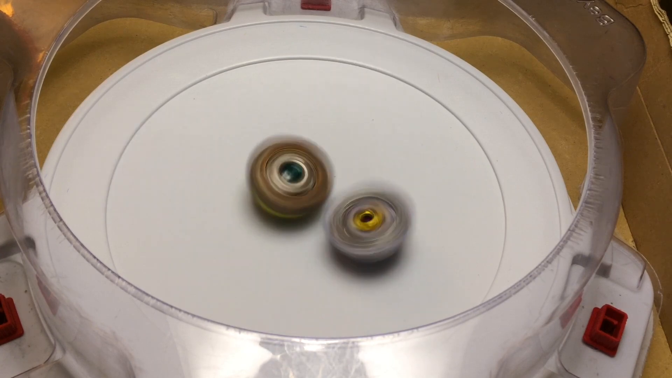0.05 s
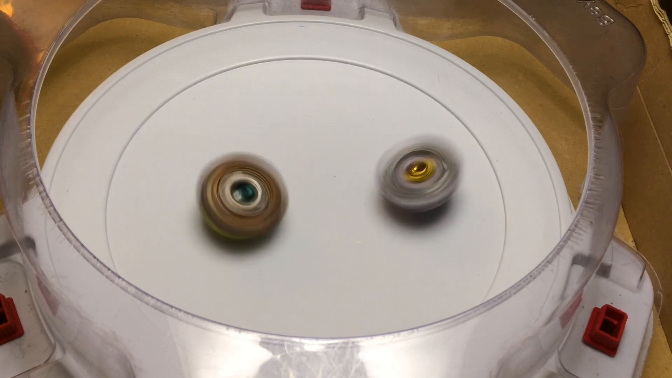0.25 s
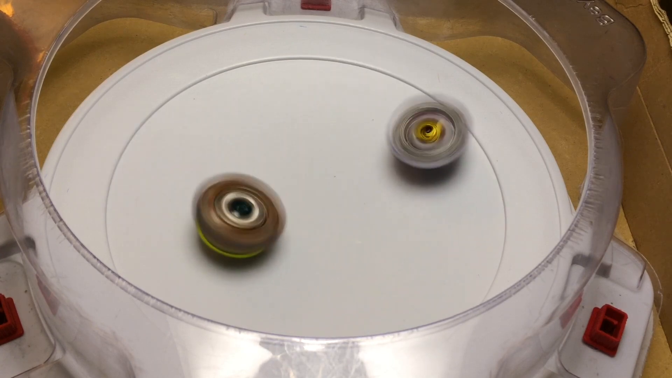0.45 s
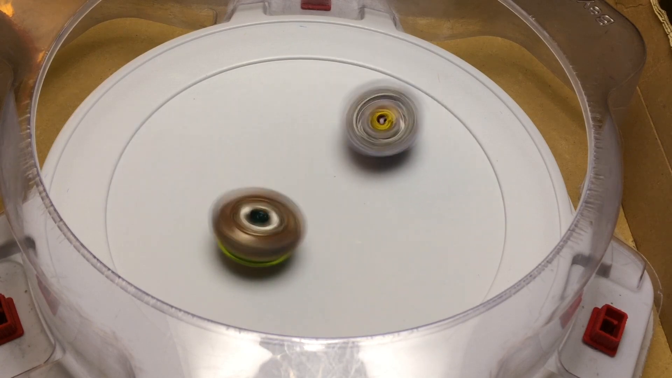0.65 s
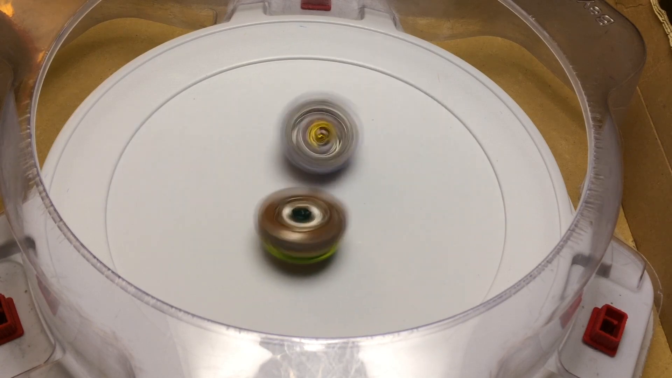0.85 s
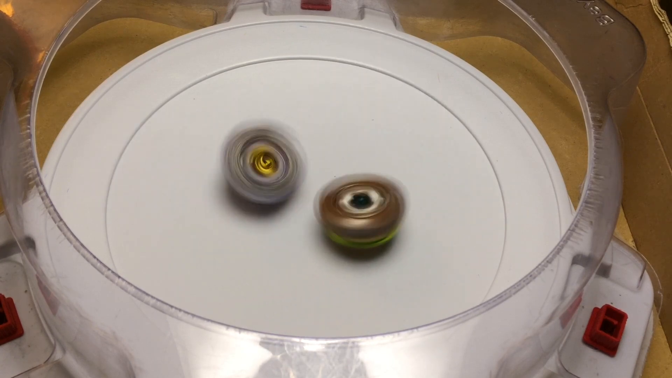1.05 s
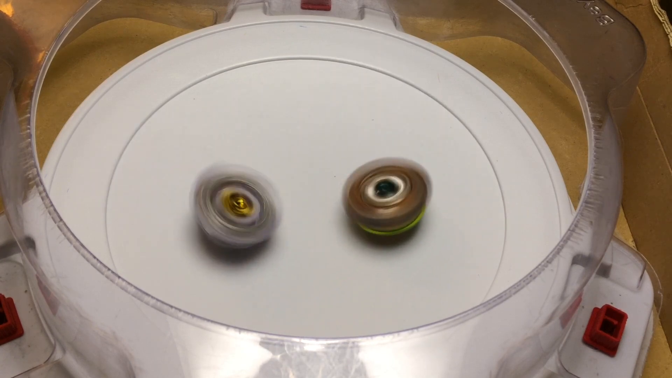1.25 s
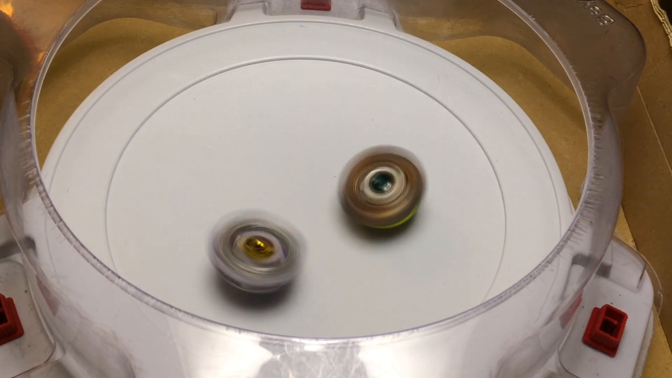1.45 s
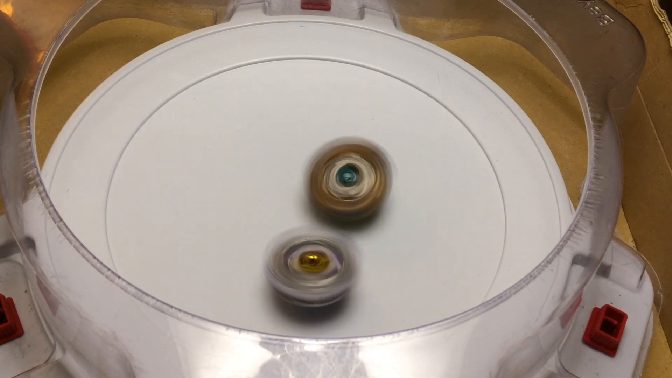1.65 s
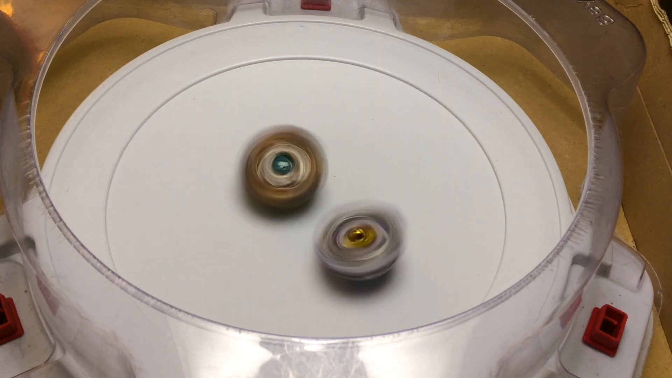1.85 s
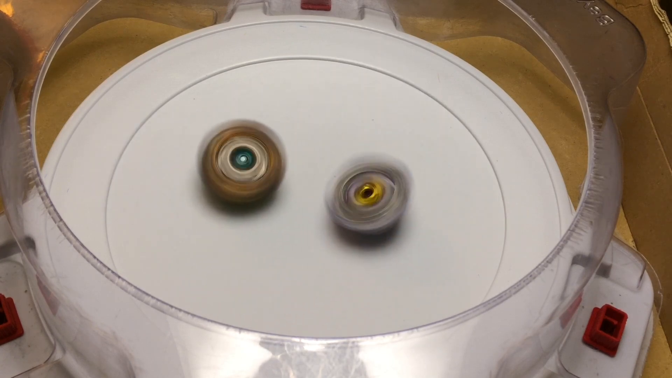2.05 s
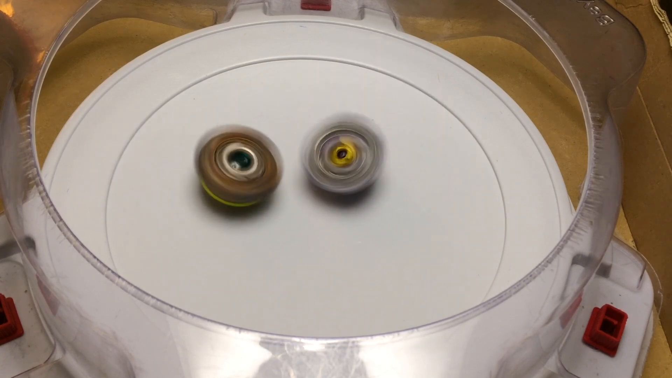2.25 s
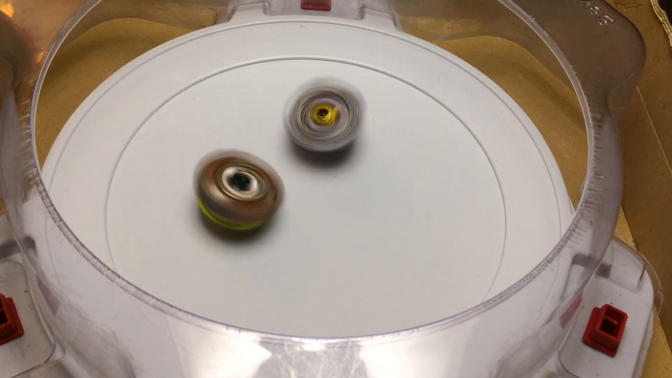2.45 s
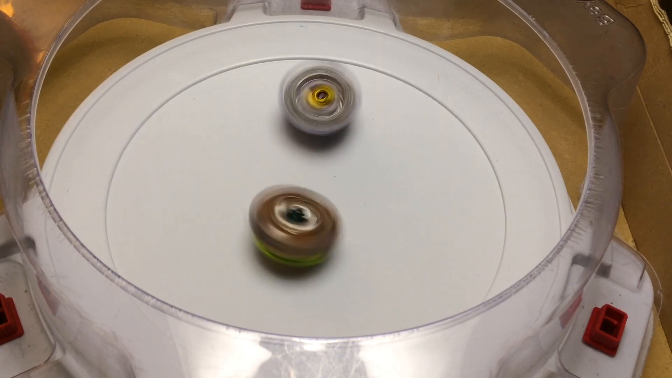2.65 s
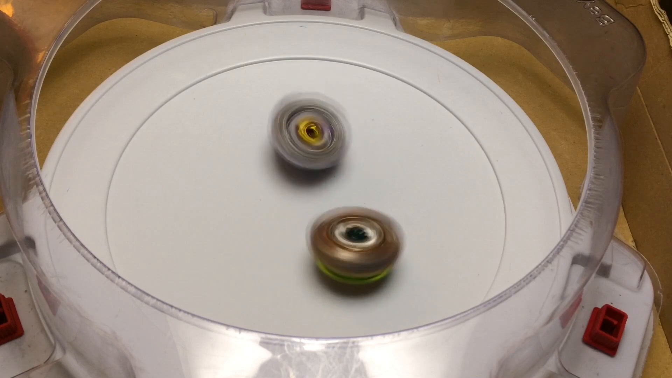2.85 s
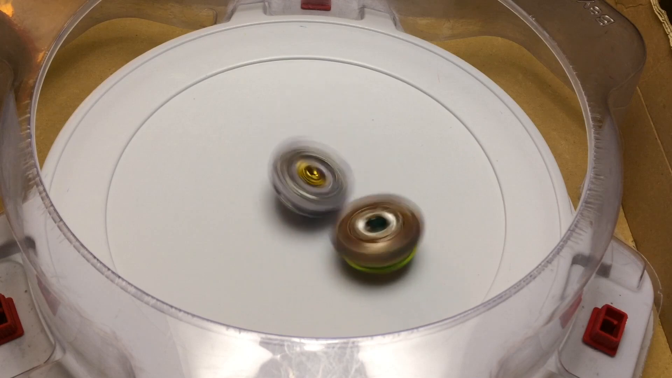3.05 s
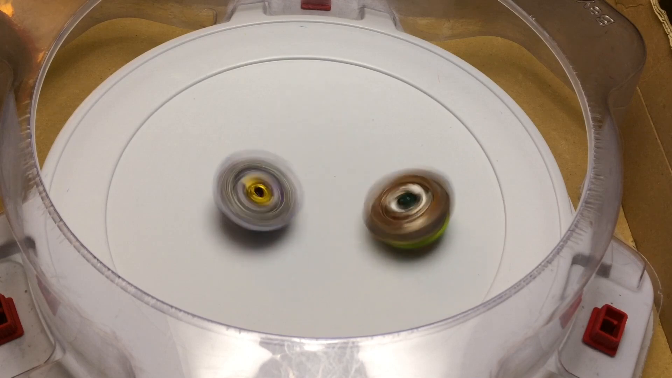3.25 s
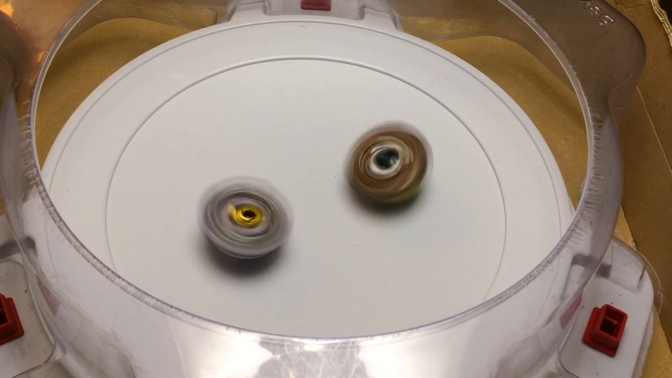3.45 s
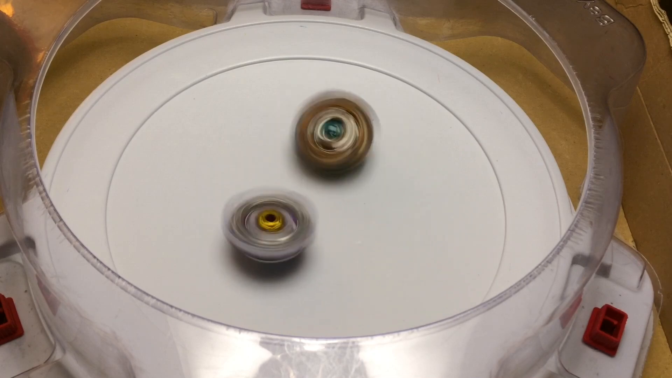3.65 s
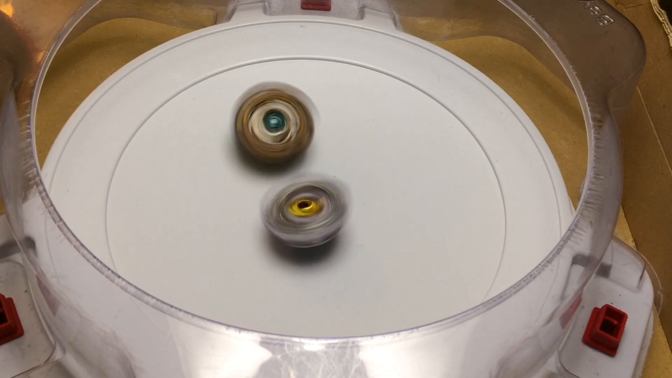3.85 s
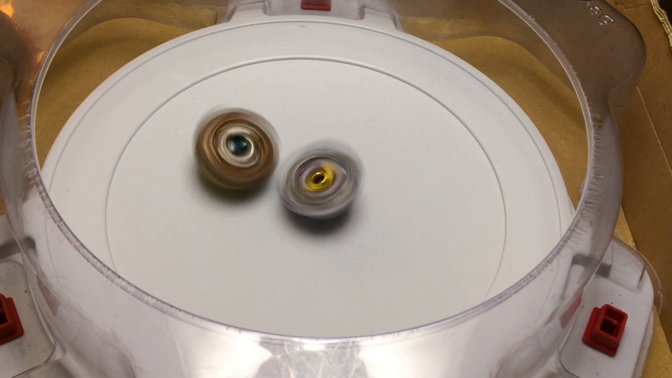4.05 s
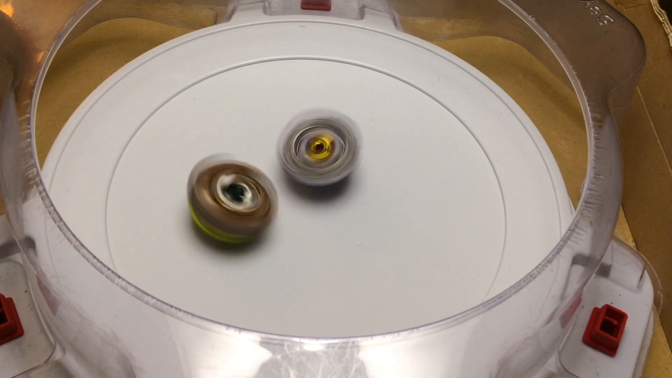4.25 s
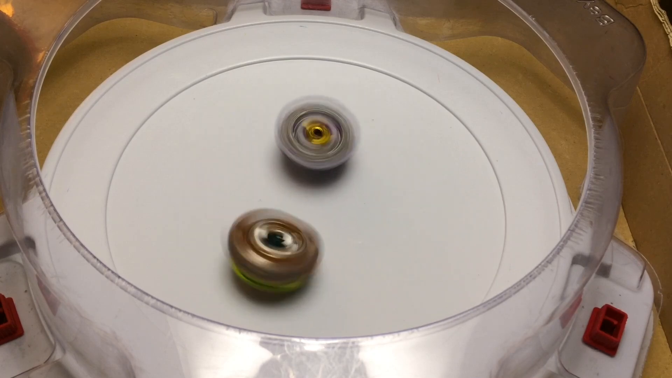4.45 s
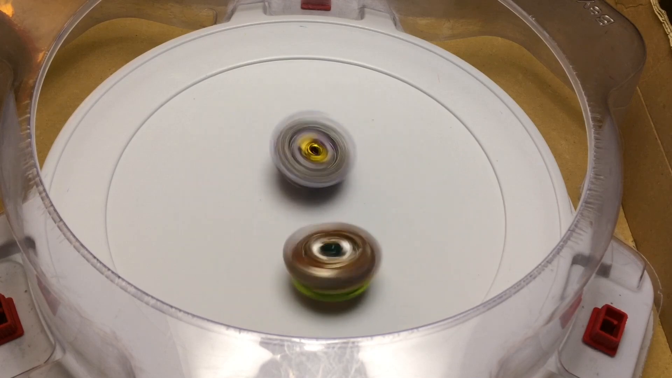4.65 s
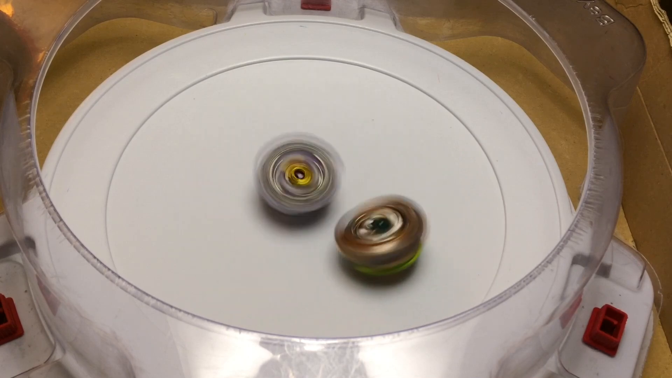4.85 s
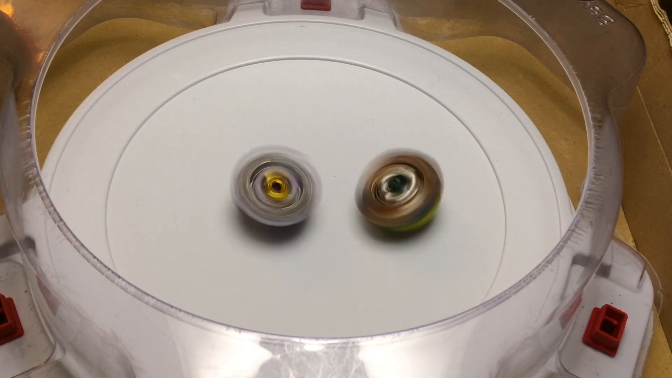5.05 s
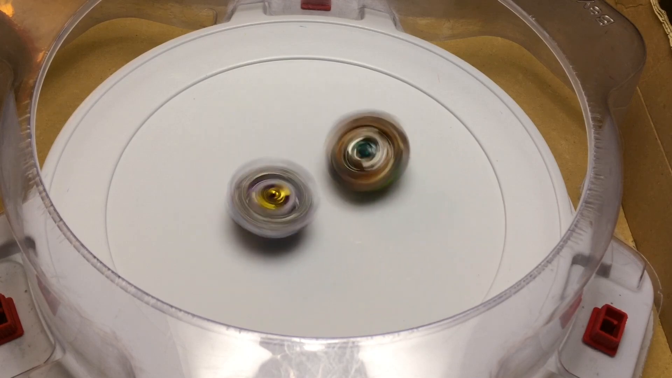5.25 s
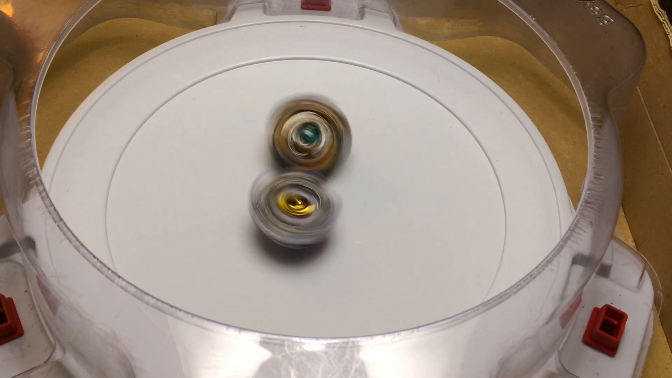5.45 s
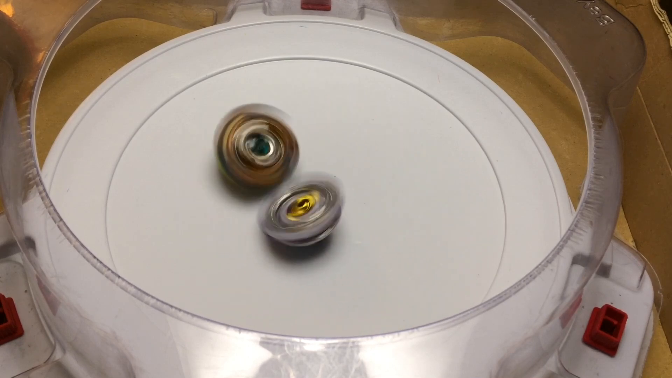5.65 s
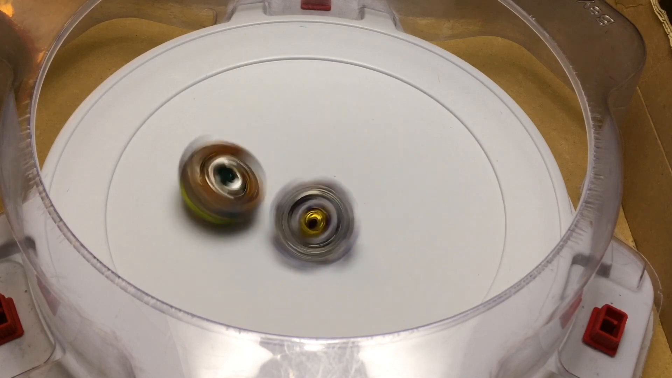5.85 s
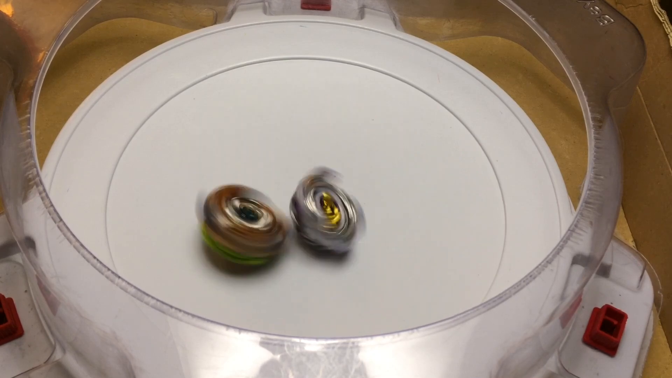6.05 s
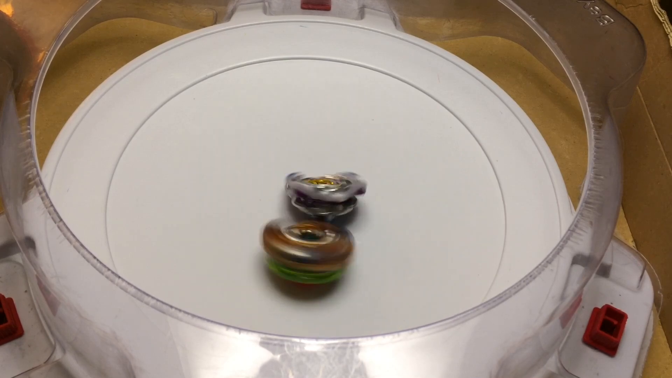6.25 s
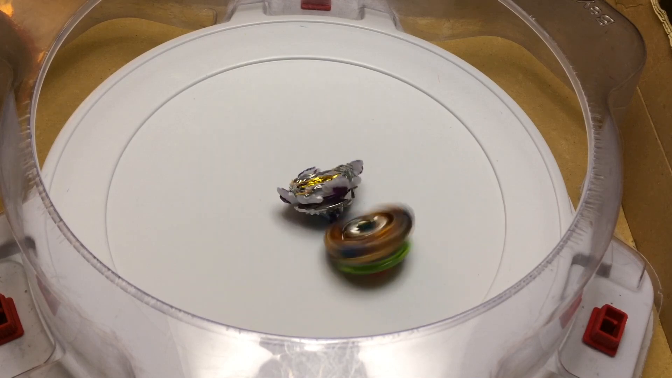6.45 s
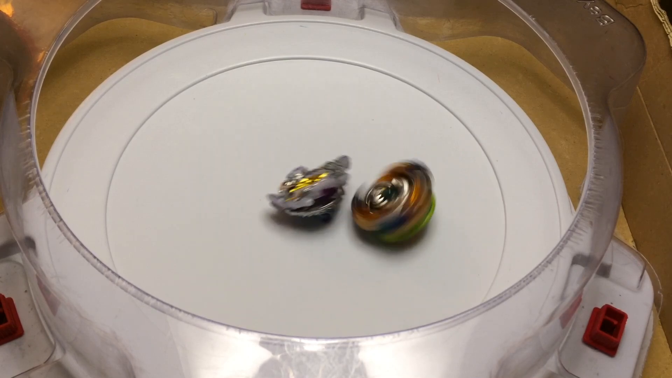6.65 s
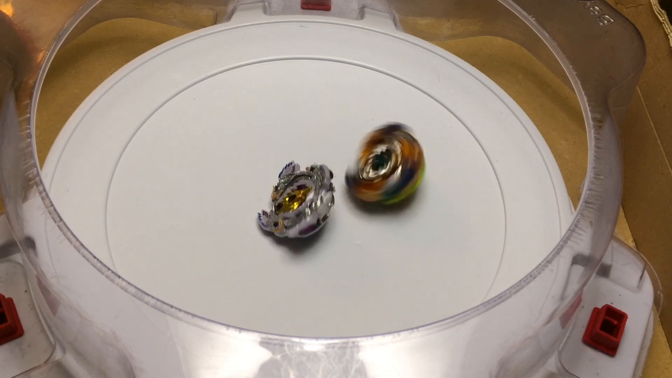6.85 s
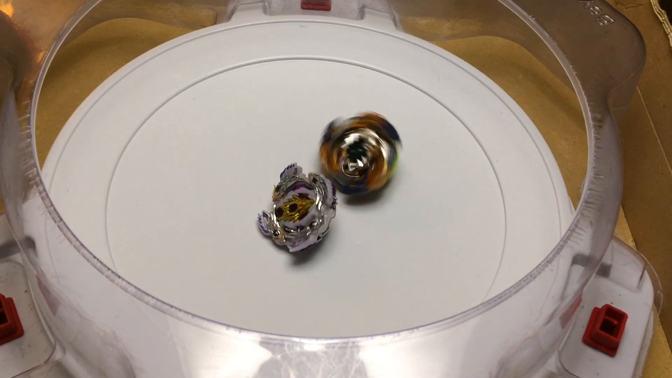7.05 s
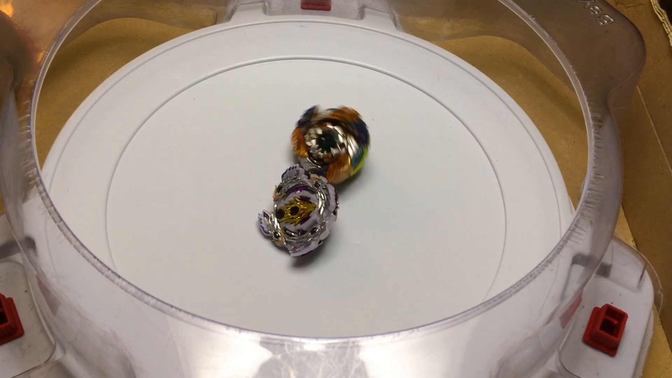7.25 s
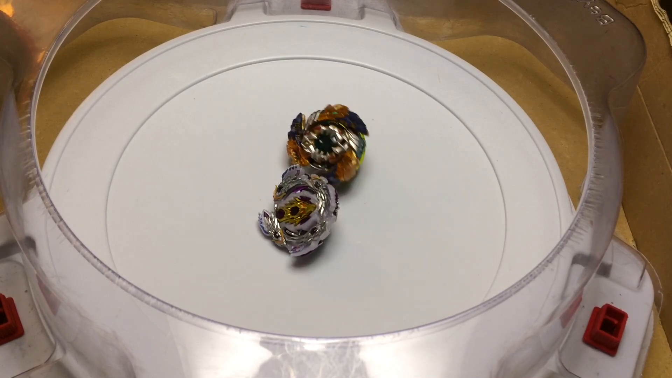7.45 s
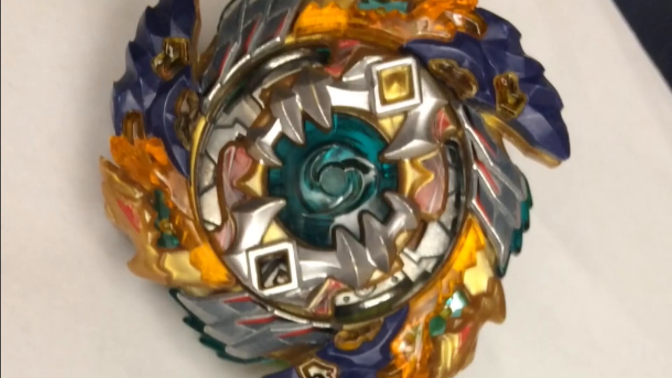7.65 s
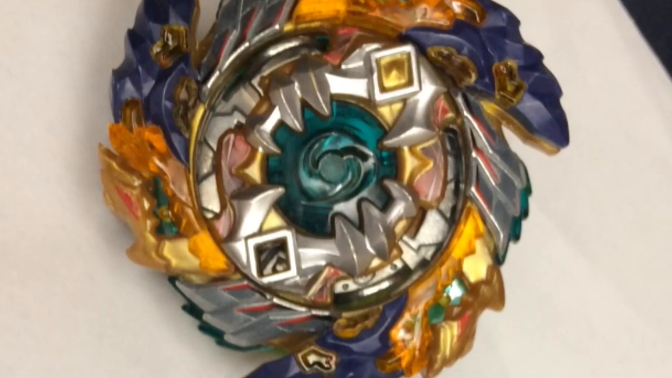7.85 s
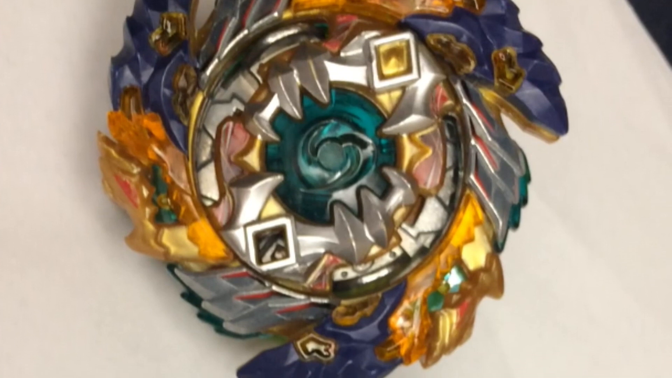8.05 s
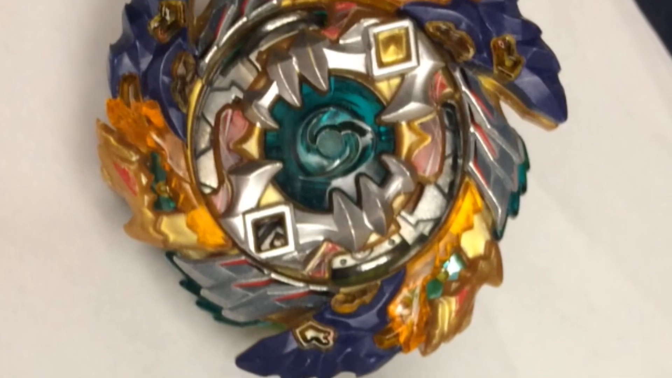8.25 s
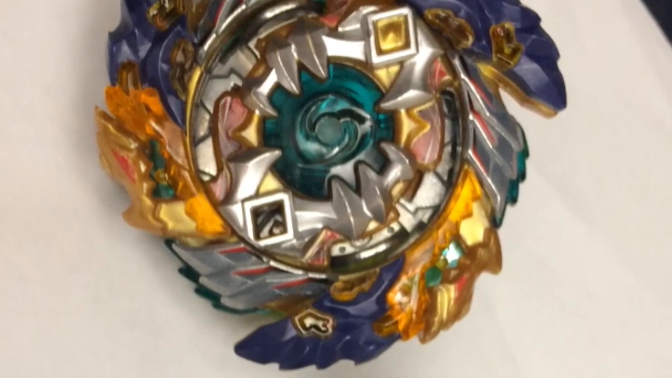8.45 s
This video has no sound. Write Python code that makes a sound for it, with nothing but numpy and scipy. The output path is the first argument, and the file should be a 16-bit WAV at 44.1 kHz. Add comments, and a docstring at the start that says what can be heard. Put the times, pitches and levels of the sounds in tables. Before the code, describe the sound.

Metal-rimmed tops whirr and scrape in a plastic bowl, crack together several times, then one falls, clatters and knocks weakly to a stop.

```python
"""Tips grind and chatter on thin plastic, then rims clash: two spinning tops circle in a dish in a small room.
Dense micro-impacts make the grinding, short noise bursts the skips, and ringing modes the metal of the rims;
the dish hums as a sinking sine with its octave, and rumbles as low filtered impacts. One top keels over,
knocks and scrapes to rest, the other nudges it ever more weakly, and the sound fades to silence."""
import sys
import numpy as np
from scipy import signal
from scipy.fft import rfft, irfft, next_fast_len
from scipy.io import wavfile
from scipy.ndimage import uniform_filter1d, map_coordinates

SR = 44100
rng = np.random.default_rng(int(sys.argv[2]) if len(sys.argv) > 2 else 0)


def bounce(signal):
    """Save signal as a 16-bit WAV file at the path given by the first command-line argument."""
    frames = np.transpose(np.atleast_2d(signal))
    limited = np.clip(frames, -1, 1)
    pcm = np.round(limited * 32767).astype(np.int16)
    wavfile.write(sys.argv[1], SR, pcm)


N = 375291

# Levels in the tables are relative: each layer adds its own trim.
# faint steady noise around the tops: (frequency [Hz], density [dB per Hz])
AIR_SPECTRUM = [(20, -14.5), (90, 0), (300, -5), (1000, -12), (4000, -25), (15000, -30.5)]
# decay of the room: (frequency [Hz], t60 [s])
ROOM_DECAY = [(100, 0.96), (500, 0.49), (3000, 0.36), (8000, 0.23), (15000, 0.17)]
# final fade: (time [s], level [dB])
FADE_LEVEL = [(0, -3), (7.62, -2.5), (7.655, -10), (7.68, -74), (7.72, -140)]
TOP_HZ = 16100  # the band ends here

# whirr of the fast, unbalanced top: (time [s], pitch [Hz])
WHIRR_PITCH_CURVE = [(0, 101), (0.95, 96.5), (1.2, 91.5), (1.6, 87.7), (2.7, 85)]
# loudness of its fundamental: (time [s], level [dB])
WHIRR_LEVEL_CURVE = [(0.0, -55), (0.31, -42.5), (0.49, -58), (0.7, -71), (0.85, -36), (1.06, -45),
                     (1.19, -35), (1.23, -44), (1.88, -52), (2.15, -39.5), (2.5, -43.5), (2.75, -58)]
WHIRR_END_S, WHIRR_FADE_DB_PER_S = 2.3, 20  # the whirr dies away from here

# low rumble of the dish: (time [s], level [dB])
RUMBLE_LEVEL_CURVE = [(0, -56.5), (0.25, -50), (0.6, -62.5), (0.9, -53.5), (2.3, -54), (2.75, -61),
                      (3.15, -52.5), (3.4, -59), (4.0, -54), (4.55, -60), (4.9, -54), (5.35, -58.5),
                      (6.1, -45.5), (6.4, -57), (6.9, -58), (7.55, -72)]
# colour of rumble and shudder: (frequency [Hz], density [dB per Hz])
RUMBLE_SPECTRUM = [(20, -49.5), (45, -17), (68, -9.5), (90, -3.5), (112, -4.5), (145, -14), (220, -14.5),
                   (400, -33.5), (1000, -78.5)]
# the whole dish shakes after a blow
SHUDDER_DB, SHUDDER_RISE_S, SHUDDER_T60_S = 2.5, 0.0053, 0.15
SHUDDER_GROWS = 0.55  # dB per dB of the blow: soft blows are the deepest

# resonances of the thin dish: (centre [Hz], width [Hz], level [dB])
DISH_MODES = [(174, 15, 6), (233.7, 14, 10.5), (362, 30, 2.5), (394, 130, -2), (517, 29, 2.5),
              (595, 97, -30.5), (920, 190, -4), (1637, 78, -4.5), (1720, 62, -4.5), (2700, 190, -7.5),
              (3543, 140, -19.5)]
# ringing of the metal rims: (frequency [Hz], level [dB], t60 [s])
RIM_MODES = [(3320, 2, 0.098), (4117, 3.5, 0.16), (4680, -5, .07), (5000, 1, 0.054), (6100, -6, 0.12),
             (7450, -3.5, .08), (7800, -6, 0.088), (9800, 1.5, 0.069), (10180, 0.5, 0.12),
             (12470, -5.5, 0.16), (14200, -4.5, .09), (15100, -8, .08)]

# how hard the tops bear on the dish: (time [s], grinding level [dB], rubbing level [dB])
CONTACT_LEVELS = [(0.0, -45, -48.5), (0.14, -41.5, -47), (0.34, -45.5, -51.5), (0.86, -42.5, -52),
                  (1.05, -40, -47), (1.53, -45, -51), (1.83, -41, -52), (2.61, -44.5, -51),
                  (2.78, -43, -57.5), (3.22, -44.5, -46), (3.83, -44, -64), (4.2, -45.5, -78),
                  (4.33, -48, -63), (4.61, -45.5, -66), (4.86, -44, -59.5), (5.05, -46.5, -68),
                  (5.3, -49.5, -74), (5.47, -48, -66), (5.76, -47, -65.5), (5.95, -34.5, -38),
                  (6.31, -38.5, -53.5), (6.45, -47, -51), (6.77, -42.5, -58), (6.98, -50, -64),
                  (7.51, -70, -84), (7.55, -72, -101)]
# a tip skids across the dish: (start [s], length [s], rise of the rubbing [dB])
TIP_SKIDS = [(0.52, 0.19, 5), (0.84, 0.17, 5.5), (1.7, 0.36, 1.5)]
SKID_GRIND_SHARE = 0.32  # part of that rise which the grinding takes
# the tops rock ever more slowly as they lose speed: (time [s], rate [turns per second])
SPIN_RATE = [(0, 21.6), (0.6, 22.4), (1.8, 21.1), (4.8, 19.5), (6.8, 15), (7.5, 9.9)]
SKIPS_END_S = 5.7  # here the slower top keels over
LEAN_DB_PER_S = 0.63  # skips and chatter grow as the tops lean
CHATTER_SWAY_DB = 5.5  # the tips chatter most at one point of each turn

# colour of tips dragging on plastic: (frequency [Hz], density [dB per Hz])
GRIT_SPECTRUM = [(60, -35), (150, -2.5), (240, -4), (290, -9.5), (415, 9), (520, -1), (680, -0.5),
                 (1000, -7.5), (1230, -11), (1550, -6), (2200, -13.5), (3400, -11), (4300, -23),
                 (15500, -35)]
# colour of the bright rubbing: (frequency [Hz], density [dB per Hz])
SCRAPE_SPECTRUM = [(1500, -40), (4000, -5), (6000, 14.5), (10000, 1.5), (15500, -12)]
# colour of a tip in its socket: (frequency [Hz], density [dB per Hz])
TIP_SPECTRUM = [(500, -24.5), (1500, -3), (2300, -18.5), (3000, -12), (3570, 2), (4050, -15.5), (6000, -14),
                (10000, -20.5), (15500, -29.5)]
# colour of a tip catching on a scratch: (frequency [Hz], density [dB per Hz])
TICK_SPECTRUM = [(400, -7), (1500, -4), (3300, 2), (4500, -2), (7000, -23), (15000, -11.5)]
# colour of the metal's crack: (frequency [Hz], density [dB per Hz])
CRACK_SPECTRUM = [(300, -38.5), (2500, -16.5), (5000, 5), (7500, 4.5), (10000, 6.5), (12500, -2),
                  (15200, -3.5), (16500, -36.5)]
# colour of the plastic's clack: (frequency [Hz], density [dB per Hz])
CLACK_SPECTRUM = [(300, -16), (1200, -12.5), (2100, -17), (2900, -5), (3500, 1), (4100, -10), (5500, -10.5),
                  (9000, -22)]
# colour of the dish under taps and clashes: (frequency [Hz], density [dB per Hz])
THUD_SPECTRUM = [(40, -22), (100, -11.5), (250, -3.5), (480, 14.5), (750, 2.5), (1600, 6), (2600, -1.5),
                 (6000, -47.5)]
# colour of the dish under the fallen top: (frequency [Hz], density [dB per Hz])
SLAP_SPECTRUM = [(40, -15), (95, 1), (140, 0.5), (230, 3), (300, -3), (390, 2), (520, -1), (630, -7),
                 (790, -3.5), (980, -2), (1250, -7.5), (1700, -5), (2600, -13), (6000, -45)]
# colour of sharp rim teeth: (frequency [Hz], density [dB per Hz])
SIZZLE_SPECTRUM = [(3000, -44), (8500, -6), (11500, -1), (12500, -4.5), (15200, -2), (16200, -24)]

# hardest landings of the upright tops: (time [s], tick [dB], dish thud [dB], clack [dB])
TIP_TAPS = [(0.0425, -35, -29, -43), (0.3459, -34, -33.5, -45), (0.5292, -35, -29.5, -40),
            (0.5743, -28, -38, -44), (0.6655, -34, -55, -40), (0.7403, -35, -52, -43),
            (0.9259, -29, -31, -43), (1.1111, -34, -35, -45), (1.2898, -33, -38.5, -45),
            (1.6889, -38, -38, -44), (1.7824, -30, -32, -38), (1.8203, -30, -30.5, -38),
            (1.875, -35, -29, -40), (1.928, -30.5, -34.5, -36), (2.4084, -37, -36, -43),
            (2.5024, -15.5, -28.5, -38), (2.6973, -27.5, -30.5, -41.5), (2.7078, -43, -54, -36),
            (2.813, -30, -32, -35), (2.9565, -36, -36, -41.5), (3.1151, -35.5, -39, -43),
            (3.4876, -37, -39, -39), (3.5472, -43, -48, -43.5), (3.6176, -39, -45, -41),
            (3.6879, -31, -38.5, -44), (3.7199, -35, -36.5, -42), (3.873, -31, -34.5, -40),
            (3.9173, -36, -42, -41), (3.9487, -47, -54, -37.5), (4.0222, -37, -45, -39.5),
            (4.126, -39, -36.5, -46), (4.1786, -30, -33.5, -40), (4.3725, -37, -37, -43),
            (4.563, -32, -38.5, -53), (4.5908, -44, -38, -43.5), (4.6877, -36, -32.5, -41),
            (4.7975, -39, -44.5, -39), (5.1262, -43, -44.5, -44.5), (5.1686, -36, -41, -48.5),
            (5.2165, -37, -45.5, -48.5), (5.254, -44, -43.5, -48), (5.3694, -53, -37.5, -41),
            (5.4763, -27.5, -41.5, -44), (5.555, -24.5, -32, -36), (5.6885, -32.5, -38, -47)]
# the fallen top is jostled and its rim knocks: (time [s], tick [dB], dish thud [dB], clack [dB])
FALLEN_KNOCKS = [(5.797, -14, -25, -30), (5.8143, -19, -27, -40), (5.875, -27, -31.5, -36),
                 (5.9084, -20.5, -30.5, -39), (5.9588, -27, -30, -38), (5.9695, -21, -38, -52),
                 (5.9942, -23, -29, -42), (6.0991, -22, -30.5, -39), (6.2305, -23, -28.5, -31),
                 (6.3451, -25, -33, -38.5), (6.4275, -23, -34, -41), (6.4626, -17.5, -28.5, -39),
                 (6.4693, -19, -27, -30.5), (6.4855, -20, -30, -37), (6.5153, -21, -38, -41),
                 (6.555, -33, -51, -48), (6.6028, -29, -38, -40.5), (6.65, -20, -34.5, -38),
                 (6.7536, -29, -32, -33), (6.7819, -18, -35, -32.5), (6.8543, -22, -35.5, -36),
                 (6.9202, -28.5, -42, -43), (6.996, -33, -46, -59), (7.0467, -43, -41, -49),
                 (7.0961, -45, -48, -49), (7.1593, -45, -47.5, -49.5), (7.2606, -39, -43, -43.5),
                 (7.3309, -55, -47.5, -56), (7.3894, -69, -63, -56.5), (7.4763, -67, -52, -46.5),
                 (7.5932, -56, -52, -59.5)]
# rims graze and clash: (time [s], crack [dB], dish thud [dB], clack [dB], sizzle [dB], dish note [Hz])
RIM_CLASHES = [(0.0129, -38.5, -39.5, -31.5, -46.5, 616), (0.0572, -37.5, -35, -39.5, -42, 400),
               (0.0945, -27.5, -31.5, -39, -42, 510), (0.136, -29.5, -33.5, -40, -39, 420),
               (0.197, 0, -22, -19.5, -8.5, 460), (1.0331, -2, -28.5, -22.5, -13.5, 493),
               (2.4489, 0.5, -21, -22, -13, 543), (3.1651, 1, -23, -15.5, -13.5, 532),
               (4.0319, -22, -40, -42, -53, 390), (4.072, -29, -37, -42, -50, 390),
               (4.2308, -12.5, -29.5, -25, -20.5, 514), (4.9009, -2.5, -23.5, -16.5, -17, 412),
               (5.5165, -4, -31, -16.5, -15.5, 471), (5.7424, -17, -39, -27.5, -27.5, 380),
               (5.7707, -2, -19, -21.5, -21, 516), (6.0751, -4.5, -20.5, -21, -23, 416),
               (6.2024, -6.5, -25, -20.5, -19.5, 441), (6.3011, -16, -32, -32.5, -33, 400),
               (6.3774, -17.5, -35, -35.5, -39, 358), (6.7089, -8, -21.5, -25, -27.5, 350)]


def amp(db):
    """Decibels to gain."""
    return 10 ** (np.asarray(db) / 20)


def unit(x):
    """Scale to rms 1."""
    return x / np.sqrt(np.mean(x ** 2) + 1e-20)


def along(points, hz):
    """Read (frequency, value) points on a log frequency axis."""
    f, values = np.transpose(points)
    return np.interp(np.log(hz + 1), np.log(f), values)


def curves(rows):
    """One value per sample for each column after the time."""
    s, *columns = np.transpose(rows)
    return [np.interp(np.arange(N) / SR, s, column) for column in columns]


def wobble(rate):
    """A smooth random curve, rate knots a second."""
    knots = rng.standard_normal(int(N * rate / SR) + 4)
    return map_coordinates(knots, [np.arange(N) * rate / SR])


def filtered(x, response):
    """Shape x by a complex response of frequency."""
    m = 2 * next_fast_len(N // 2 + SR // 4)
    return irfft(rfft(x, m) * response(np.fft.rfftfreq(m, 1 / SR)), m)[:N]


def coloured(x, points, size=4096):
    """Causal minimum-phase filter of energy 1 with the given spectrum."""
    cepstrum = irfft(np.log(amp(along(points, np.fft.rfftfreq(size, 1 / SR)))))
    # folding the cepstrum puts the energy as early as possible
    cepstrum[1:size // 2] *= 2
    cepstrum[size // 2 + 1:] = 0
    kernel = irfft(np.exp(rfft(cepstrum)))
    return signal.oaconvolve(x, kernel / np.linalg.norm(kernel))[:N]


def add(track, s, sound):
    """Mix a sound into the track at time s."""
    part = track[max(round(s * SR), 0):][:len(sound)]
    part += sound[:len(part)]


def burst(t, rise, t60):
    """A swelling, dying rush of tiny impacts, of energy 1."""
    x = rng.standard_normal(len(t)) * (1 - np.exp(-t / rise)) * amp(-60 * t / t60)
    return x / np.linalg.norm(x)


def grains(rate, spread_db):
    """Random micro-impacts of uneven size, rms 1."""
    hits = rng.random(N) < rate / SR
    signs = rng.choice([-1, 1], N)
    sizes = amp(spread_db * np.clip(rng.standard_normal(N), -2, 2))
    return unit(hits * signs * sizes)


def wandering(x, depth_db):
    """A moving contact drives ever different resonances: the colour shifts from moment to moment."""
    z = signal.stft(x, nperseg=256)[2]
    field = uniform_filter1d(rng.standard_normal(z.shape), size=3, axis=0)  # smooth over frequency
    field = uniform_filter1d(field, size=5, axis=1)  # and over time
    gain = unit(amp(depth_db * np.clip(unit(field), -2, 2)))
    return signal.istft(z * gain, nperseg=256)[1][:N]


def turns():
    """Turns made since the start."""
    return np.cumsum(curves(SPIN_RATE)[0]) / SR


def contact():
    """Levels of grinding and rubbing in dB; each skid swells and sinks over them."""
    t = np.arange(N) / SR
    skid_db = sum(db * np.sin(np.pi * np.clip((t - s) / length, 0, 1)) for s, length, db in TIP_SKIDS)
    grind_db, rub_db = curves(CONTACT_LEVELS)
    return grind_db + SKID_GRIND_SHARE * skid_db, rub_db + skid_db


def air():
    """The faint steady noise is coloured white noise."""
    return amp(-63.0) * unit(coloured(rng.standard_normal(N), AIR_SPECTRUM))


def room(x, count=3):
    """The room answers with noise tails that crossfade as the tops wander; the treble dies first."""
    wet, t = np.zeros(N), np.arange(N) / SR
    for k in range(count):
        hz, age, z = signal.stft(rng.standard_normal(SR // 2), SR, nperseg=256)
        decay = amp(-60 * age / along(ROOM_DECAY, hz)[:, None])
        onset = 1 - np.exp(-age / 0.0039)
        tail = signal.istft(z * decay * onset, SR, nperseg=256)[1]
        share = np.cos(np.pi * (0.6004 * t + k / count)) * np.sqrt(2 / count)
        wet += signal.oaconvolve(x * share, tail / np.linalg.norm(tail))[:N]
    return wet


def shudder():
    """Each clash and knock shakes the whole dish, which answers with a low thump."""
    shake, t = np.zeros(N), np.arange(SR // 3) / SR
    for s, _, kick_db, *_ in [*RIM_CLASHES, *FALLEN_KNOCKS]:
        level = amp(SHUDDER_GROWS * kick_db + SHUDDER_DB)
        add(shake, s, level * burst(t, SHUDDER_RISE_S, SHUDDER_T60_S))
    return coloured(shake, RUMBLE_SPECTRUM)


def rumble():
    """The dish rumbles under the tops: dense micro-impacts heard through its low end."""
    rolling = unit(coloured(grains(rate=1200, spread_db=3.5), RUMBLE_SPECTRUM))
    return amp(curves(RUMBLE_LEVEL_CURVE)[0] + 8.5) * rolling


def whirr(octave_db=-46, dish_hz=173, half_width_hz=6):
    """The unbalanced top shakes the dish at a sinking pitch; its octave swells as it slides into a dish resonance."""
    (hz,), (db,) = curves(WHIRR_PITCH_CURVE), curves(WHIRR_LEVEL_CURVE)
    phase = 2 * np.pi * np.cumsum(hz * (1 + 0.0056 * wobble(28))) / SR
    resonance = 1 / np.hypot(1, (2 * hz - dish_hz) / half_width_hz)
    octave = resonance * amp(octave_db + 1.5 * wobble(7.9)) * np.sin(2 * phase)
    release = amp(-WHIRR_FADE_DB_PER_S * np.maximum(np.arange(N) / SR - WHIRR_END_S, 0))
    return release * (amp(db + 3.5) * np.sin(phase) + octave)


def dish(x):
    """The thin plastic dish rings in its resonances, a sum of band-passes of alternating sign."""
    def response(f):
        total = 0
        for k, (centre, width, db) in enumerate(DISH_MODES):
            damping = 1j * f * width
            total = total + (-1) ** k * amp(db) * damping / (centre * centre - f * f + damping)
        return total
    return filtered(x, response)


def grinding():
    """Tips drag and rub over the plastic; the leaning tops press harder once a turn."""
    grind_db, rub_db = contact()
    pressure = amp(0.7 * np.cos(2 * np.pi * turns()) + 2.42 * wobble(70))
    drag = pressure * grains(rate=1400, spread_db=0)
    grit = amp(grind_db + 1.5) * unit(coloured(drag, GRIT_SPECTRUM))
    hum = amp(grind_db - 5.0) * unit(dish(drag))
    scrape = unit(coloured(pressure * grains(rate=3000, spread_db=3), SCRAPE_SPECTRUM))
    return grit + hum + amp(rub_db - 4.5) * scrape


def ticking(per_second=220, spread_db=7, level_db=-1):
    """The tips catch on scratches: crisp ticks that come and go with the rubbing."""
    ticks = coloured(grains(per_second, spread_db), TICK_SPECTRUM)
    return amp(contact()[1] + level_db) * unit(wandering(ticks, depth_db=1.5))


def chatter(per_second=130, t60=0.011, spread_db=6, level_db=-10.5):
    """Tiny hops of the tips: each is a short rattle, coloured by the tip in its socket."""
    hops, t = np.zeros(N), np.arange(SR // 25) / SR
    times = np.flatnonzero(rng.random(N) < per_second / SR) / SR
    for s, size in zip(times, np.clip(rng.standard_normal(len(times)), -2, 2)):
        add(hops, s, amp(spread_db * size) * burst(t, 0.0019, t60))
    lean_db = LEAN_DB_PER_S * np.minimum(np.arange(N) / SR, SKIPS_END_S)
    sway_db = CHATTER_SWAY_DB * np.cos(2 * np.pi * turns())
    return amp(contact()[0] + lean_db + sway_db + level_db) * unit(coloured(hops, TIP_SPECTRUM))


def strikes(rows, body, rise, crack_t60, clack_t60, thud_t60,
            crack_db, ring_db, clack_db, thud_db, dish_db, vary_db):
    """Each contact cracks and rings the metal, clacks the plastic and kicks the dish, whose colour is body."""
    crack, ring, clack, thud = np.zeros((4, N))
    t = np.arange(SR // 3) / SR
    hz, mode_db, t60 = np.transpose(RIM_MODES)[:, :, None]
    for s, metal_db, kick_db, body_db, *_ in rows:
        # every contact meets the rims at a new spot, so the modes change in strength
        sizes = amp(mode_db + vary_db * rng.standard_normal(hz.shape) - 60 * t / t60)
        modes = np.sum(sizes * np.sin(2 * np.pi * (hz * t + rng.random(hz.shape))), axis=0)
        add(ring, s, amp(metal_db + ring_db) * modes / np.linalg.norm(modes))
        add(crack, s, amp(metal_db + crack_db) * burst(t, rise, crack_t60))
        # the soft plastic answers more slowly than the metal
        add(clack, s, amp(body_db + clack_db) * burst(t, 2 * rise, clack_t60))
        add(thud, s, amp(kick_db) * burst(t, 2 * rise, thud_t60))
    metal = ring + coloured(crack, CRACK_SPECTRUM)
    plastic = coloured(clack, CLACK_SPECTRUM)
    return metal + plastic + amp(thud_db) * coloured(thud, body) + amp(dish_db) * dish(thud)


def skips(tick_db=6, thud_db=-4, clack_db=-11, spread_db=4.5, jitter_s=0.0043):
    """Once a turn a tip hops, harder as the top bears down and leans: rows laid out as in TIP_TAPS."""
    at = np.flatnonzero(np.diff(np.floor(turns())))
    late, size, edge = np.clip(rng.standard_normal((len(at), 3)), -1.6, 1.6).T
    grind_db, rub_db = contact()
    s = at / SR + jitter_s * late
    force_db = grind_db[at] + spread_db * size
    lean_db = LEAN_DB_PER_S * s
    ticks = rub_db[at] + lean_db + tick_db + 3 * edge
    rows = np.column_stack([s, ticks, force_db + thud_db, force_db + lean_db + clack_db])
    return rows[s < SKIPS_END_S]


def taps():
    """Tips skip and land on the dish with a short dry tick."""
    return strikes([*TIP_TAPS, *skips()], THUD_SPECTRUM,
                   rise=0.0008, crack_t60=0.02, clack_t60=0.036, thud_t60=0.055,
                   crack_db=12, ring_db=-6, clack_db=27.5, thud_db=23.5, dish_db=25, vary_db=5)


def knocks():
    """The whole weight of the fallen top lands on the dish: a deeper, broader blow that hardly rings the metal."""
    return strikes(FALLEN_KNOCKS, SLAP_SPECTRUM,
                   rise=0.0006, crack_t60=0.045, clack_t60=0.047, thud_t60=0.059,
                   crack_db=12.5, ring_db=-4, clack_db=26.5, thud_db=31.5, dish_db=20, vary_db=4.5)


def clashes():
    """Toothed rims rake over each other for a few milliseconds; the dish booms at a note set by where they stand."""
    sizzle, wash, boom = np.zeros((3, N))
    t = np.arange(SR // 3) / SR
    for s, metal_db, kick_db, _, sizzle_db, note_hz in RIM_CLASHES:
        add(sizzle, s, amp(sizzle_db + 26) * burst(t, rise=0.0006, t60=0.014))
        # a dense rattling wash follows each crack and dies away slowly
        add(wash, s, amp(metal_db + 3) * burst(t, rise=0.0057, t60=0.28))
        swell = amp(kick_db + 3.5 - 60 * t / 0.068) * (1 - np.exp(-t / 0.0008))
        add(boom, s, swell * np.sin(2 * np.pi * note_hz * t))
    blows = strikes(RIM_CLASHES, THUD_SPECTRUM,
                    rise=0.0013, crack_t60=0.024, clack_t60=0.037, thud_t60=0.096,
                    crack_db=13, ring_db=-0.5, clack_db=27, thud_db=27.0, dish_db=27.5, vary_db=8)
    return blows + coloured(sizzle, SIZZLE_SPECTRUM) + coloured(wash, CRACK_SPECTRUM) + boom


def scene():
    """Tops and dish, with the room and its faint steady noise around them."""
    tips = wandering(taps() + grinding() + chatter(), depth_db=3.5)
    tops = clashes() + knocks() + ticking() + tips
    low_end = rumble() + shudder() + whirr()
    return (tops + amp(-12.0) * room(tops) + low_end + air())[None]


def record(dry):
    """The hardest peaks are rounded off, the sound fades out, and the band ends steeply."""
    rounded = dry[0] / (1 + np.abs(dry[0] / 1.1) ** 4) ** (1 / 4)
    faded = rounded * amp(curves(FADE_LEVEL)[0])
    return filtered(faded, lambda hz: 1 / np.sqrt(1 + (hz / TOP_HZ) ** 160))[None]


dry = scene()
out = record(dry)
bounce(out)
```